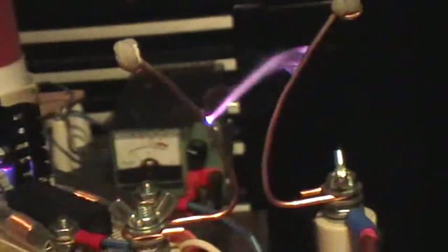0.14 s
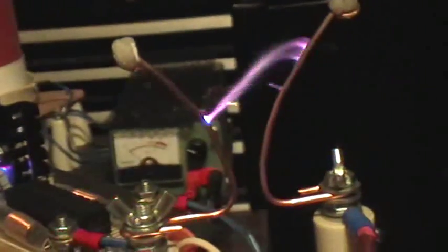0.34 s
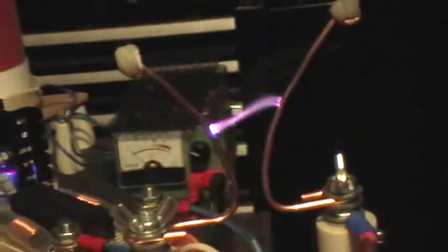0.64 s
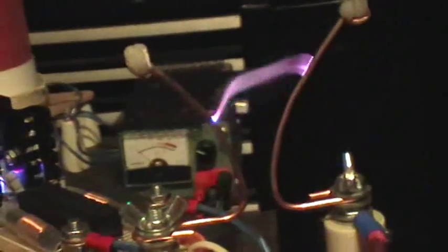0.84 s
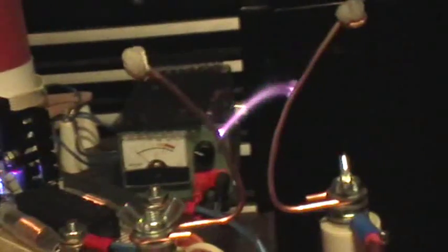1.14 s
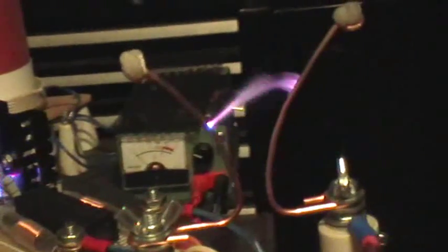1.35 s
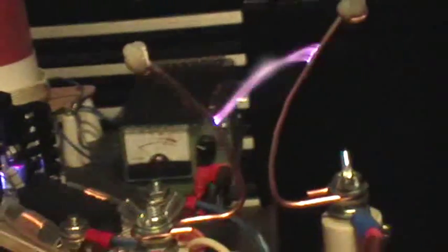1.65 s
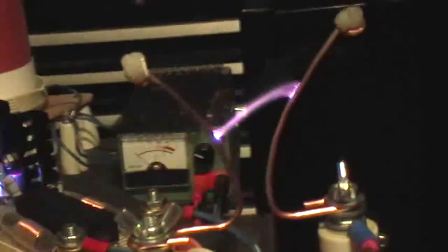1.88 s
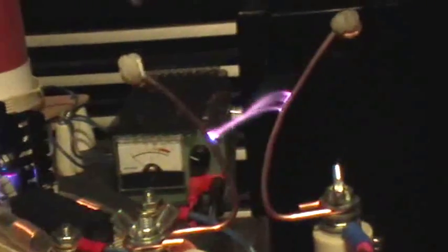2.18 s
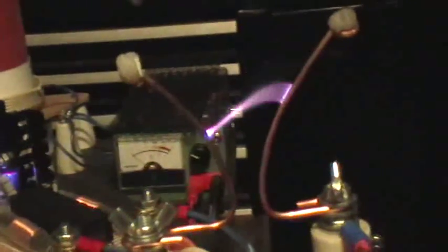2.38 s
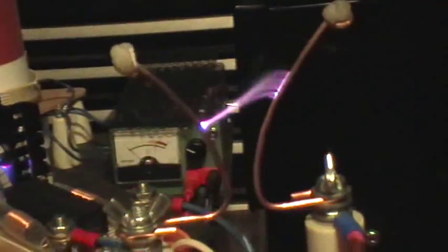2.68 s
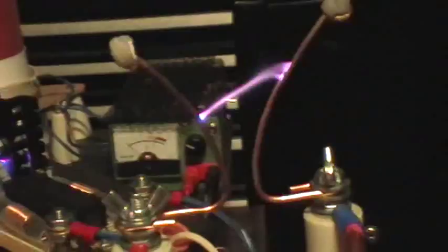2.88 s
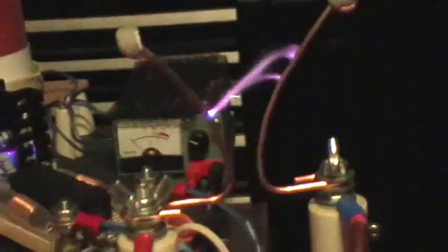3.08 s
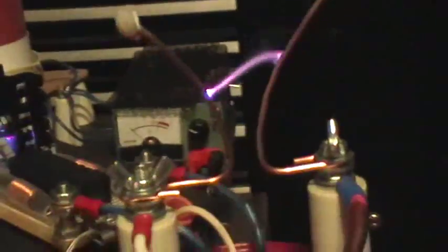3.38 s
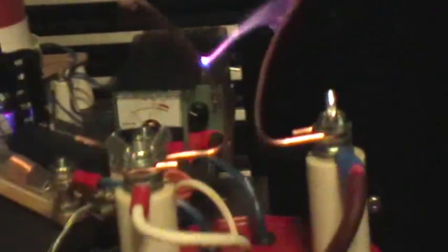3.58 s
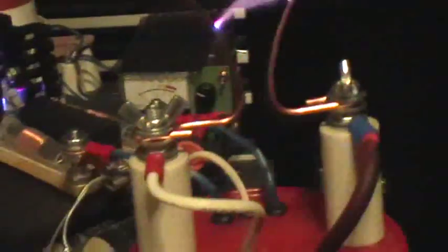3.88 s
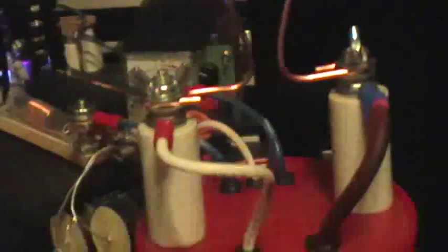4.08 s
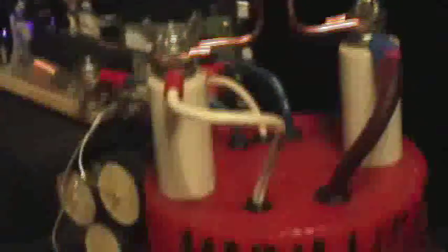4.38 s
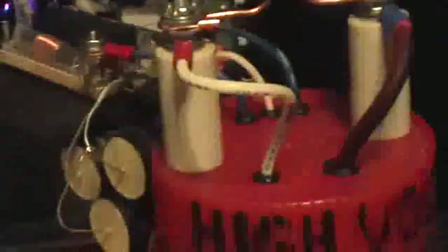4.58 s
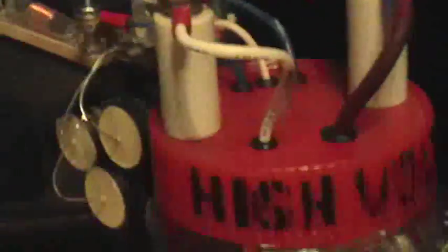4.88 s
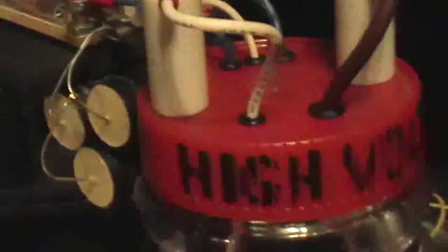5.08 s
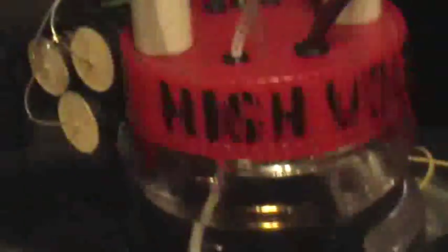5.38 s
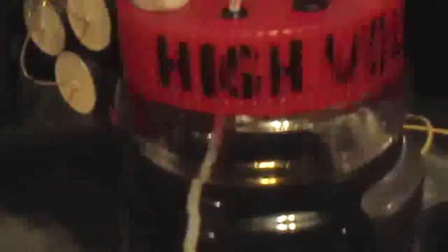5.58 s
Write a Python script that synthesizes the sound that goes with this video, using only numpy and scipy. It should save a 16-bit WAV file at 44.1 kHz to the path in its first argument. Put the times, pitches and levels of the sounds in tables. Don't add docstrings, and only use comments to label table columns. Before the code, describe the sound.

A small camera microphone sits close to a high-voltage arc on a workshop bench. A steady low fan drone, mostly around 100 to 400 Hz with soft air hiss, runs throughout. Right at the start a shrill squeal near 8 kHz, under 20 ms long, breaks into hard snaps. After that come irregular dry cracks, tiny ticks and faint prickle, often in pairs a few hundredths of a second apart. Millisecond-long chirps, gliding slightly and each ended by a ragged snap, cluster around 0.65 to 0.95, 1.4 to 1.77 and 2.34 seconds. From 2.4 to 3.3 seconds mostly smaller snaps and ticks remain. Stronger zaps return from 3.35, around 4.0 to 4.4, and most densely and loudly from 4.7 to 5.2, with a few more until 5.73. Bright sizzle and spitting briefly trail louder bursts. Reflections from the bench and walls are very short.

```python
import sys
import numpy as np
from scipy import signal
from scipy.fft import rfft, irfft, next_fast_len
from scipy.io import wavfile
from scipy.ndimage import map_coordinates

SR = 44100
rng = np.random.default_rng(int(sys.argv[2]) if len(sys.argv) > 2 else 0)


def waveform_to_disk(signal):
    frames = np.transpose(np.atleast_2d(signal))
    scaled = np.clip(frames, -1, 1) * 32767
    samples = np.round(scaled).astype(np.int16)
    wavfile.write(sys.argv[1], SR, samples)


def linear_from_db(decibels):
    return 10 ** (np.asarray(decibels, float) / 20)


N = 253178

# f/Hz, density/dB
FAN_AIR = [(45, -31), (86, -5.5), (210, 2.5), (320, -5), (493, -14), (600, -8.5), (800, -9.5),
           (1240, -18.5), (2000, -20), (2770, -24.5), (4500, -27.5), (7000, -35), (11000, -38),
           (15500, -44)]
# f/Hz, level/dB
FAN_TONES = [(55, -62.5), (98, -54.5), (194, -53), (780, -62), (1560, -62), (2003, -63.5)]
# f/Hz, side over mid/dB
WIDTH = [(100, -69.5), (400, -25.5), (1500, -19), (8000, -5.5), (14000, 3)]
# t/s, length/ms, peak level/dB, first f/Hz, last f/Hz
PURE_SQUEALS = [
    (0.024, 17, -7, 8100, 7880),
    (1.561, 5.8, -6.5, 8580, 8440),
    (4.0093, 7.7, -8, 7520, 7620),
    (4.1649, 3.3, -7.5, 7740, 7620),
    (5.0466, 3.3, -9.5, 8770, 8330),
    (5.0507, 3, -5.5, 8740, 8350),
]
# t/s, length/ms, peak level/dB, first f/Hz, last f/Hz
HELD_SQUEALS = [(0.0382, 0.97, -12.5, 7780, 7420), (0.0498, 5.1, -7, 8960, 8520),
                (0.6537, 4.4, -26, 8260, 8320), (0.7994, 3.5, -13.5, 6980, 5830),
                (0.8075, 4, -12.5, 7700, 8150), (0.8169, 2.9, -14, 7330, 8140),
                (0.9292, 6.4, -8.5, 8540, 7150), (1.4497, 4.8, -10, 7090, 7800),
                (1.5556, 3.2, -9.5, 8200, 7600), (2.7071, 1.0, -16, 7630, 7620),
                (2.3363, 4.1, -8, 8200, 7440), (3.8544, 4.4, -9, 7220, 7780),
                (4.016, 1.83, -10.5, 7390, 7930), (5.0415, 2, -25, 8600, 8200),
                (4.7008, 2.6, -17, 8320, 7750), (4.7075, 3.2, -3, 7190, 9000),
                (4.7334, 4.1, -14, 8540, 8020), (4.8998, 2.9, -8, 5730, 6670),
                (4.9275, 4.5, -15.5, 8420, 7630), (4.8888, 2.2, -19, 6140, 6800),
                (5.1566, 4.2, -10.5, 8430, 7770), (5.1634, 10, -13.5, 8660, 7770),
                (5.182, 2.6, -11, 8660, 7760), (5.711, 3.1, -9.5, 8090, 7780)]
# t/s, peak level/dB, f/Hz, rasp over the tone/dB
CHIRPS = [(0.049, -8, 7460, -9), (0.1987, -20.5, 8200, -20.5), (0.6612, -20.5, 8700, -18),
          (0.8123, -10.5, 7740, -27.5), (0.94, -12.5, 7430, -4), (1.3952, -14.5, 7840, -6.5),
          (1.4677, -12, 7870, -11), (1.471, -10.5, 8150, -10), (1.6514, -6.5, 8670, -21),
          (1.6886, -12, 7840, -12), (1.7229, -22.5, 8200, -27), (1.768, -8, 8080, -26),
          (2.3445, -9, 7600, -13), (3.3458, -10, 7400, -11.5), (3.6371, -13.5, 7220, -23),
          (4.3824, -8.5, 7240, -14), (4.4255, -8, 8210, -19), (4.55, -20, 7940, -16),
          (4.6802, -14, 8320, -12.5), (4.6839, -17, 9150, -0.5), (4.7133, -23, 8700, -15.5),
          (4.8853, -13, 7300, -14), (4.8956, -16, 7160, -24.5), (5.0091, -9.5, 8600, -11.5),
          (5.0388, -9.5, 8500, -8), (5.1786, -12.5, 8200, -15), (5.3648, -12, 7490, -11.5),
          (5.7269, -15.5, 8750, -13.5), (5.335, -29, 8500, -28), (0.3775, -36, 8800, -12)]
# f/Hz, density/dB
PLASMA = [(3000, -14), (6500, -9), (8000, 5.5), (9000, -2), (10300, -12), (15500, -30.5)]
# f/Hz, density/dB
EMBER = [(1500, -56.5), (4000, 0), (7000, 2.5), (9500, 4), (12000, -33), (16000, -25.5)]
# t/s, blow level/dB
THUDS = [(0.042, -16.5), (0.2467, -24), (0.281, -20.5), (0.2844, -26), (0.295, -25), (0.5305, -24),
         (0.68, -25.5), (1.134, -25), (1.338, -26), (1.3585, -25), (1.4323, -23), (5.055, -20),
         (2.0868, -28), (2.3857, -27), (2.5571, -26), (2.8678, -25), (3.0175, -25.5), (3.4194, -22.5),
         (3.6407, -28), (3.6691, -24.5), (4.3871, -15), (4.7053, -16), (4.889, -17), (5.043, -19),
         (5.1709, -10), (5.1745, -26), (5.05, -5), (0.0302, -37.5), (0.9329, -32), (4.7114, -19.5)]
# t/s, blow level/dB
PINGS = [(0.2206, -24), (0.4234, -19), (0.5512, -19.5), (0.5677, -27), (2.73, -43), (0.8055, -13.5),
         (0.955, -23), (1.0501, -24), (1.4738, -15.5), (1.4862, -21), (1.733, -22.5), (1.8844, -19),
         (1.908, -15.5), (2.1212, -27), (2.2137, -26), (2.4358, -26), (2.9047, -23.5), (3.0985, -25),
         (3.1537, -22), (3.5756, -20), (3.654, -21), (3.8785, -17), (3.92, -24.5), (4.1686, -15.5),
         (4.4484, -26.5), (4.8926, -20.5), (5.1378, -29), (5.2193, -24), (5.3457, -31), (5.4863, -27)]
# t/s, blow level/dB
TICKS = [(0.1416, -37), (0.6299, -25.5), (1.104, -25), (0.5092, -34), (0.6065, -29), (0.685, -26),
         (1.0279, -29), (1.0597, -38), (1.326, -29), (1.5773, -29), (1.71, -35), (2.0962, -36),
         (5.7356, -22), (2.532, -27), (2.6468, -35), (2.7134, -39), (2.88, -32), (3.0529, -29.5),
         (3.1756, -29.5), (3.4336, -25.5), (3.605, -31), (3.7826, -31), (3.8317, -31), (4.0297, -30),
         (4.088, -36), (4.2409, -28.5), (4.337, -25.5), (4.5106, -31), (4.8635, -28), (4.9682, -26),
         (.1204, -43), (.1824, -49), (0.214, -42), (.4005, -50), (.4174, -33), (0.888, -44), (.9028, -45),
          (1.018, -32), (1.0854, -33), (1.6272, -36), (1.639, -39), (1.7558, -38), (2.2274, -35),
          (2.399, -39), (2.652, -47), (2.683, -43), (2.7766, -43), (2.82, -36), (2.9218, -41), (2.973, -42),
          (3.5628, -33), (3.8048, -33), (4.126, -38), (4.218, -36), (4.3153, -37), (4.536, -34),
          (5.377, -31), (5.4457, -33), (5.534, -36.5), (5.59, -38)]
# t/s, blow level/dB, time until the slip/ms
HOPS = [(0.315, -34, 8), (0.367, -32, 8.3), (0.5246, -39, 11), (0.8498, -30, 13.6), (0.9717, -30, 6.3),
        (1.2417, -31.5, 20), (1.278, -33, 17), (1.4137, -36, 23.3), (1.5048, -31.5, 16.4),
        (1.9372, -35, 19.5), (2.154, -32, 36), (2.4706, -28.5, 14.2), (2.5775, -33, 20.4),
        (2.7372, -28.5, 17), (2.7993, -35, 14), (2.946, -30.5, 9.5), (3.106, -29.5, 38), (3.275, -27, 22.9),
        (3.3344, -27.5, 31), (3.8931, -27.5, 11.2), (3.9631, -29.5, 28), (4.0592, -28, 7.4),
        (4.441, -36, 36), (4.575, -38.5, 30), (5.0842, -28.5, 14), (5.223, -32, 10), (5.2771, -33.5, 26),
        (5.4101, -31, 13.6), (5.4514, -30, 18.3), (5.5519, -28.5, 16)]
# f/Hz, t60/s
WALLS = [(1500, 0.12), (8500, 0.078), (15000, 0.065)]
# f/Hz, gain/dB
MIC = [(9000, 1), (12000, -3), (15600, -10), (16600, -46.5), (17200, -76)]

CHIRP_MS, CHIRP_SAG_HZ = 1.7, 204
RASP_DB, RASP_DB_PER_DECADE, RISING_RASP_DB, PURE_RASP_DB = -18, 11.5, 2.5, -32
OVERTONE_DB = -13
TONE_EMBER_SHARE, TONE_SIZZLE_SHARE = 0.12, 0.5
THUD_RING_DB, PING_RING_DB, RING_PER_BLOW = -4, -3.5, 0.54
TEAR_DB, TEAR_PER_RASP, TEAR_SCATTER_DB = -2.5, 0.48, 2.5
EDGE_DB, EDGE_PER_BLOW, EDGE_SCATTER_DB = -12, 0.24, 4.5


def unit(x):
    return x / np.sqrt(np.mean(x ** 2) + 1e-20)


def along(points, hz):
    f, v = np.transpose(points)
    return np.interp(np.log(hz + 1), np.log(f + 1), v)


def wobble(rate, size):
    knots = rng.standard_normal(int(size * rate / SR) + 4)
    return map_coordinates(knots, [np.arange(size) * rate / SR])


def filtered(x, response):
    m = next_fast_len(x.shape[-1] + 4096)
    spectrum = rfft(x, m) * response(np.fft.rfftfreq(m, 1 / SR))
    return irfft(spectrum, m)[..., :x.shape[-1]]


def peak(f, hz, width_hz):
    return 1j * f * width_hz / (hz * hz - f * f + 1j * f * width_hz)


def add(track, s, piece):
    track[max(round(s * SR), 0):][:len(piece)] += piece


def fan():
    colour = lambda f: linear_from_db(along(FAN_AIR, f)) * [np.ones_like(f), linear_from_db(along(WIDTH, f))]
    mid, side = filtered(rng.standard_normal((2, N)), colour)
    t = np.arange(N) / SR
    tones = np.zeros(N)
    for hz, db in FAN_TONES:
        level = linear_from_db(db + 1.3 * wobble(rate=4.75, size=N))
        tones += level * np.sin(2 * np.pi * hz * t + 2.93 * wobble(rate=8, size=N))
    drift_db = 0.6 * wobble(rate=3, size=N)
    return linear_from_db(-41.5 + drift_db) / mid.std() * np.array([mid + side, mid - side]) + tones


def oscillations():
    held = []
    for s, ms, db, first_hz, last_hz in HELD_SQUEALS:
        slide = (abs(last_hz - first_hz) + 1) / ms / 100
        rasp_db = RASP_DB + RASP_DB_PER_DECADE * np.log10(slide) + RISING_RASP_DB * (last_hz > first_hz)
        held.append((s, ms, db, first_hz, last_hz, rasp_db))
    sag = CHIRP_SAG_HZ / 2
    chirps = [(s, CHIRP_MS, db, hz + sag, hz - sag, rasp_db) for s, db, hz, rasp_db in CHIRPS]
    return held + chirps + [(*row, PURE_RASP_DB) for row in PURE_SQUEALS]


def squeals():
    out, lead, t = np.zeros(N + SR), 0.004, np.arange(SR // 25) / SR
    colour = lambda f: peak(f, 5550, 3400) + 1.75 * peak(f, 9200, 3600)
    for s, ms, db, first_hz, last_hz, rasp_db in oscillations():
        end = lead + ms / 1000
        rough = min(linear_from_db(rasp_db), 0.3)
        grow_db = np.minimum(14000 * (t - lead - 0.0006), 0)
        stop_db = np.minimum(-22000 * (t - end + 0.000075), 0)
        jitter = (0.0023 + 0.33 * rough) * wobble(rate=1350, size=len(t))
        pitch = np.interp(t, [lead, end], [first_hz, last_hz]) * (1 + jitter)
        cycle = 2 * np.pi * np.cumsum(pitch) / SR
        flutter = linear_from_db((0.5 + 9 * rough) * wobble(rate=990, size=len(t)))
        tone = flutter * (np.sin(cycle) + linear_from_db(OVERTONE_DB) * np.sin(2 * cycle))
        misses = rng.standard_normal(len(t)) ** 3 * linear_from_db(2 * grow_db)
        rasp = filtered(misses / np.sqrt(15), colour) * linear_from_db(rasp_db + 5)
        add(out, s - lead, linear_from_db(db - 0.22 + stop_db) * (linear_from_db(grow_db) * tone + rasp))
    return out[:N]


def heat(arc, t60):
    cool = linear_from_db(-60 / (t60 * SR))
    return signal.lfilter([1 - cool], [1, -cool], np.abs(arc))


def sizzle(arc):
    flicker = linear_from_db(3.5 * wobble(rate=220, size=N) + 2.5 * wobble(rate=30, size=N))
    noise = unit(filtered(flicker * rng.standard_normal(N), lambda f: linear_from_db(along(PLASMA, f))))
    return linear_from_db(-32) * heat(arc, 0.1) ** 0.52 * noise


def embers(arc):
    spits = rng.standard_normal(N) * linear_from_db(5 * wobble(rate=700, size=N))
    return linear_from_db(-3) * heat(arc, 0.018) * unit(filtered(spits, lambda f: linear_from_db(along(EMBER, f))))


def jumps():
    thuds = [(s, db, THUD_RING_DB) for s, db in THUDS]
    return thuds + [(s, db, PING_RING_DB - RING_PER_BLOW * db) for s, db in PINGS]


def blow(f):
    return peak(f, 4300, 6500) + linear_from_db(-8.5) * peak(f, 1200, 900)


def snaps(rows):
    blows, rings, t = np.zeros(N), np.zeros(N + SR), np.arange(260) / SR
    early = 0.00005
    chances = rng.standard_normal((len(rows), 3))
    for (s, db, ring_db), (detune, linger, grit) in zip(rows, chances):
        blows[min(round((s - early) * SR), N - 1)] -= linear_from_db(db + 13.5)
        life = 0.0035 * linear_from_db(3 * linger)
        ring = np.cos(2 * np.pi * 8900 * (1 + 0.07 * detune) * t) * linear_from_db(ring_db - 5.5 - 60 * t / life)
        crack = rng.standard_normal(len(t)) * linear_from_db(-8 + 2.5 * grit - 60 * t / 0.006)
        add(rings, s - early, linear_from_db(db) * (crack * np.minimum(t / 0.00015, 1) - ring))
    dull = lambda f: 1 / (1 + 1j * f / 11000) ** 2
    body = filtered(blows, lambda f: blow(f) * dull(f))
    return body + filtered(rings[:N], lambda f: 2.27 * peak(f, 5880, 6900) * dull(f))


def restrikes():
    s, ms, db, _, _, rasp_db = np.transpose(oscillations())
    u, v = rng.standard_normal((len(s), 2)).T
    blow_db = db + TEAR_DB + TEAR_PER_RASP * rasp_db + TEAR_SCATTER_DB * u
    edge_db = EDGE_DB - EDGE_PER_BLOW * blow_db + EDGE_SCATTER_DB * v
    return np.transpose([s + ms / 1000, blow_db, edge_db])


def tears():
    low, high, t = np.zeros(N + SR), np.zeros(N + SR), np.arange(130) / SR
    for s, db, edge_db in restrikes():
        ragged = rng.standard_normal((2, len(t))) * linear_from_db(-60 * t / 0.0062)
        add(low, s - 0.0002, linear_from_db(db - 1.5) * (ragged[0] - 1.5 * (t == 0)))
        add(high, s - 0.0002, linear_from_db(db + edge_db + 8.5) * ragged[1])
    soft = filtered(low[:N], lambda f: blow(f) / (1 + 1j * f / 6000) ** 2)
    return soft + filtered(high[:N], lambda f: peak(f, 9100, 9000) ** 2)


def small_jumps():
    return TICKS + [(s + k * ms / 1000, db) for s, db, ms in HOPS for k in range(2)]


def ticks():
    rows = small_jumps()
    return np.column_stack([rows, 5.2 + 7 * rng.random(len(rows))])


def prickle(count=280):
    draw = rng.random((count, 4))
    parent = np.array(THUDS + PINGS + small_jumps())[:, 0]
    chosen = parent[(draw[:, 0] * len(parent)).astype(int)]
    when = chosen + 0.0026 - 0.019 * np.log(draw[:, 1])
    return np.transpose([when, -39 - 9 * draw[:, 2], 0.97 + 7 * draw[:, 3]])


def bench(arc):
    echo = lambda f: linear_from_db(-14) * np.exp(-2j * np.pi * f * 0.000941) * peak(f, 6000, 3300)
    return filtered(arc, lambda f: 1 + echo(f))


def room(x):
    hz, t, z = signal.stft(rng.standard_normal((2, SR // 4)), SR, nperseg=128)
    fade = linear_from_db(-60 * t / along(WALLS, hz)[:, None])
    tail = signal.istft(z * fade, SR, nperseg=128)[1]
    tail = tail / np.linalg.norm(tail[0])
    late = np.pad(x, (90, 0))[None]
    mid, side = signal.fftconvolve(late, tail, axes=1)[:, :N]
    side *= linear_from_db(-9)
    return np.array([mid + side, mid - side])


def scene():
    tones = squeals()
    cracks = tears() + snaps(jumps()) + snaps(ticks())
    arc = tones + cracks + embers(TONE_EMBER_SHARE * tones + cracks)
    arc = arc + snaps(prickle()) + sizzle(TONE_SIZZLE_SHARE * tones + cracks)
    arc = bench(arc)
    side = filtered(arc, lambda f: 1j * linear_from_db(along(WIDTH, f) - 17) - linear_from_db(-40))
    return np.array([arc + side, arc - side]) + linear_from_db(-15) * room(arc) + fan()


def band_limit(x):
    return signal.sosfilt(signal.butter(12, 16990, fs=SR, output="sos"), x)


def record(dry):
    soft = dry / (1 + np.abs(dry / 0.8) ** 6) ** (1 / 6)
    heard = filtered(soft, lambda f: linear_from_db(along(MIC, f)))
    return band_limit(heard)


dry = scene()
out = record(dry)
waveform_to_disk(out)
```